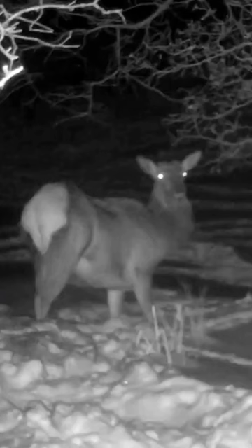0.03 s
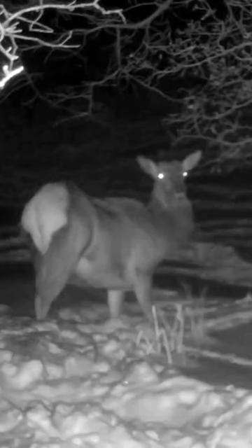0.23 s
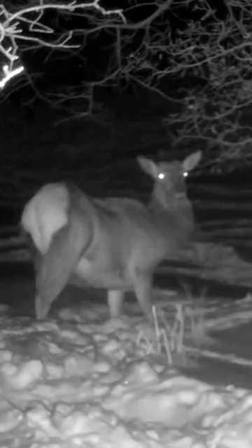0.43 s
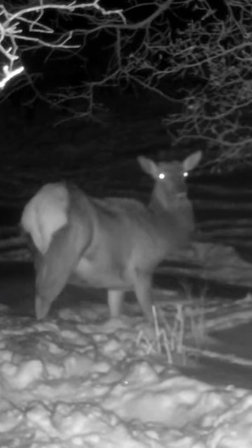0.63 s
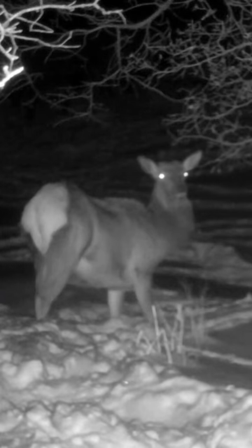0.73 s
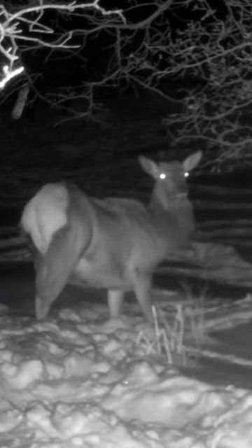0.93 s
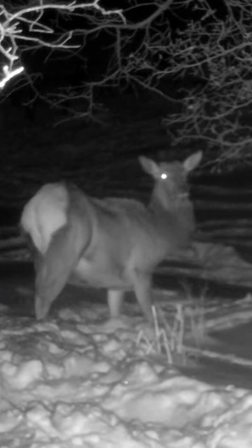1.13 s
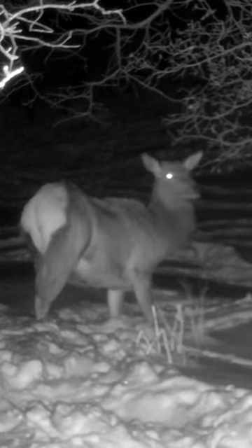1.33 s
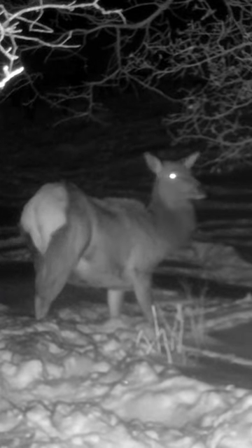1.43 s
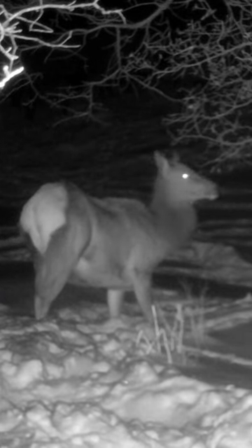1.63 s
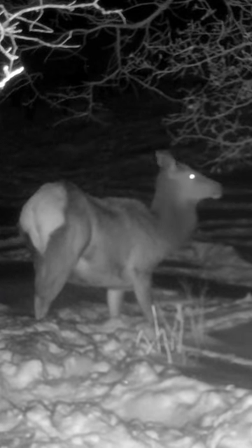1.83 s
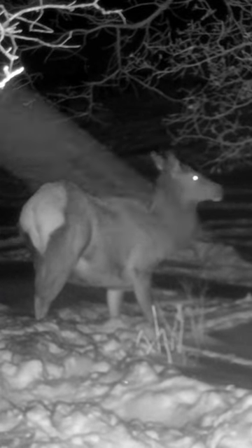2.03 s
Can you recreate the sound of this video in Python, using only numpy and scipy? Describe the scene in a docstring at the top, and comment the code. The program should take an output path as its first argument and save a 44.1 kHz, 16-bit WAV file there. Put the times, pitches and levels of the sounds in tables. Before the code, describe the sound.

An elk mews far off and another squeal drops in pitch beside a rushing stream.

```python
"""Water rushes steadily in a stream at night, while a trail camera's electronics whine and tick at the frame
rate and its housing clicks once. A far elk gives a faint, long falling mew with a second voice under its end;
then a nearer squeal drops by more than an octave. Each voice is a harmonic source filtered by fixed resonances
(for the squeal, peaks and notches as from a ground reflection's comb), with a hiss of breath, and echoes from
banks and trees."""
import sys
import numpy as np
from scipy import signal
from scipy.fft import rfft, irfft, next_fast_len
from scipy.io import wavfile
from scipy.ndimage import uniform_filter1d, map_coordinates

SR = 44100
rng = np.random.default_rng(int(sys.argv[2]) if len(sys.argv) > 2 else 0)


def dump_mix(stems):
    """Bounce the given channels to the path in sys.argv[1] as a 16-bit WAV at rate SR."""
    frames = np.atleast_2d(stems).T  # one column per channel
    limited = np.clip(frames, -1, 1)  # hard clip at full scale
    pcm = np.round(limited * 32767).astype(np.int16)
    wavfile.write(sys.argv[1], SR, pcm)


N = 92610
T = np.arange(N) / SR

# Spectrum of rushing water (frequency [Hz], relative density [dB])
WATER_SPECTRUM = [(25, -17), (76, -14.5), (200, -7.5), (350, -5.5), (800, -3), (1600, -5), (2400, -8.5),
                  (3500, -16.5), (4700, -22.5), (5300, -31.5), (7000, -32), (9500, -39), (15500, -40.5)]
# Filter of the frame ticks (frequency [Hz], gain [dB])
TICK_FILTER = [(500, -17), (4000, 6), (6500, -8), (8700, -8), (11500, -36)]
# Impulses entering that filter (time [s], level [dB])
TICK_DRIVE = [(1.54, -42.5), (1.58, -49)]
# Modes of the camera housing (frequency [Hz], relative level [dB], T60 [s])
HOUSING_MODES = [(1417, -20, 0.088), (1910, 1.5, 0.022), (2054, -14, 0.03), (3054, -2, 0.012),
                 (3170, 0.5, 0.0082), (3326, 1.5, 0.011), (3860, -3.5, 0.016), (4600, -3, 0.014),
                 (5200, -27, .05)]
# Noise of the snap (frequency [Hz], relative level [dB])
CRACK_SPECTRUM = [(400, -27), (1100, 4), (4700, 11), (5200, -13), (6500, -12), (8000, -4.5), (10000, -19)]
# Path from housing to microphone (frequency [Hz], gain [dB])
HOUSING_PATH = [(700, -1.5), (1100, 5), (1600, -0.5), (4900, -0.5), (5400, -8), (8500, -5), (11000, -29.5)]
# Peaks of the breath (time [s], level [dB])
BREATH_PEAKS = [(.29, -69), (.9, -63.5), (1.96, -61.5)]
# Hiss of the breath (frequency [Hz], relative level [dB])
BREATH_SPECTRUM = [(1500, -20), (3300, 3), (4700, -4), (5300, -41)]
# Fundamentals of the calls (time [s], frequency [Hz])
MEW_F0 = [(.3, 731), (.355, 758), (.38, 717.4), (.45, 657.4), (.5, 606), (.55, 564.3), (.6, 543),
          (.7, 501.7), (.775, 467), (.87, 436)]
SQUEAL_F0 = [(1.545, 1810), (1.575, 1930), (1.605, 1905), (1.65, 1797), (1.7, 1600), (1.725, 1462),
             (1.755, 1312), (1.763, 1185), (1.785, 1050), (1.812, 909.6), (1.828, 880.7), (1.843, 810),
             (1.895, 721.6), (1.928, 687), (1.97, 728)]
# Envelopes of the mew and of the squeal's fundamental and overtones (time [s], level [dB])
MEW_ENVELOPE = [(.3, -67), (.36, -61.5), (.44, -54), (.48, -55), (.52, -61), (.58, -60.5), (.71, -61),
                (.78, -59.5), (.83, -60), (.87, -58)]
SQUEAL_F0_ENVELOPE = [(1.54, -60), (1.572, -54), (1.594, -43.5), (1.604, -57.5), (1.63, -59), (1.642, -42),
                      (1.656, -46), (1.678, -63), (1.694, -47), (1.71, -43), (1.74, -47.5), (1.765, -74)]
SQUEAL_OVERTONE_ENVELOPE = [(1.55, -64), (1.652, -60), (1.667, -49), (1.684, -42.5), (1.703, -38),
                            (1.713, -47), (1.725, -38), (1.74, -35.5), (1.756, -43), (1.765, -41),
                            (1.786, -41), (1.794, -45.5), (1.825, -50.5), (1.848, -61.5), (1.897, -51.5),
                            (1.927, -59), (1.95, -52.5), (1.97, -58)]
# Resonances of the vocal tracts of the mew and the second voice, and the squeal's fixed peaks and notches, as
# from a ground reflection's comb (frequency [Hz], relative gain [dB])
MEW_FORMANTS = [(800, -30), (1300, -17), (1600, -12), (1880, 6), (2100, -1.5), (2300, -11), (2520, 1),
                (2750, -1), (3020, 4.5), (3350, 7), (3600, 4), (3950, -27.5)]
ANSWER_FORMANTS = [(900, -21), (1280, -7), (1550, -24), (1880, -2.5), (2270, -12), (2500, 2), (2650, 1.5),
                   (2800, 5), (3170, 4.5), (3450, -8), (4400, -36)]
SQUEAL_COLOUR = [(1400, 3), (1750, -14), (2100, 1.5), (2400, -3), (2560, -15), (2800, 2), (3020, -11.5),
                 (3230, 3.5), (3500, -3.5), (3750, -7.5), (4200, 11), (4650, -2.5), (5000, -23.5),
                 (5450, -23.5), (6400, -68)]
# Course of the second voice (time [s], fundamental [Hz], level [dB])
ANSWER_CONTOUR = [(.66, 521.5, -66), (.745, 456.4, -60.5), (.795, 404.9, -57), (.83, 374.2, -56.5),
                  (.862, 352.1, -52), (.89, 324, -57.5), (.925, 314.9, -53.5), (.96, 293.7, -63.5),
                  (1.05, 250, -70)]
# Its source timbre (time [s], roughness [0-1], tilt [dB/octave])
ANSWER_TIMBRE = [(.86, 0.04, 3), (.92, 0.2, -6), (.97, 0.65, -6.5)]
# Noisy share of the squeal's power (time [s], roughness [0-1])
SQUEAL_ROUGHNESS = [(1.6, 0.06), (1.618, 0.36), (1.64, 0.03), (1.745, 0.04), (1.76, 0.14), (1.8, 0.06),
                    (1.92, .03), (1.97, 0.7)]
# Odd overtones relative to even ones at the source (time [s], gain [dB])
SQUEAL_ODD_GAIN = [(1.61, -8), (1.65, 11), (1.675, -7), (1.725, -2), (1.75, -7.5), (1.766, 3),
                   (1.783, -0.5), (1.8, -28), (1.822, 3.5), (1.86, 4), (1.9, 10), (1.95, 4)]
# Decay of sound in the woods (frequency [Hz], T60 [s])
WOODS_T60 = [(300, .44), (5000, 0.36), (10000, 0.078)]


def amp(db):
    """Amplitude ratio of a level in decibels."""
    return 10 ** (np.asarray(db) / 20)


def unit(x):
    """Normalisation to rms 1."""
    return x / np.sqrt(np.mean(x ** 2) + 1e-20)


def along(points, hz):
    """Interpolation on a logarithmic frequency axis."""
    f, v = np.transpose(points)
    return np.interp(np.log(hz + 1), np.log(f + 1), v)


def curve(rows, column=1):
    """Linear interpolation of a timed table at every sample."""
    rows = np.asarray(rows)
    return np.interp(T, rows[:, 0], rows[:, column])


def during(rows, fade_s=0.009):
    """Trapezoidal window: 1 over a timed table's span, fading outside it."""
    return np.clip(1 + np.minimum(T - rows[0][0], rows[-1][0] - T) / fade_s, 0, 1)


def wobble(rate):
    """Smooth random modulation with rate knots a second."""
    return map_coordinates(rng.standard_normal(int(N * rate / SR) + 4), [T * rate])


def coloured(x, spectrum):
    """Zero-phase filtering by a (frequency [Hz], gain [dB]) table."""
    size = next_fast_len(N + 8192)
    gain = amp(along(spectrum, np.fft.rfftfreq(size, 1 / SR)))
    return irfft(rfft(x, size) * gain, size)[:N]


def noise(spectrum):
    """Spectrally shaped Gaussian noise of rms 1."""
    return unit(coloured(rng.standard_normal(N), spectrum))


def stream(level_db=-56.5, ripple_db=1.0):
    """Rushing water is broadband noise with slight amplitude modulation."""
    return noise(WATER_SPECTRUM) * amp(level_db + ripple_db * wobble(11.84))


def electronics(whine_hz=7796, whine_db=-72.5, frame_hz=59.5, offset_s=0.01645):
    """Phase reversal: a wavering whine flips sign at every frame, and an impulse sounds a tick."""
    frame = np.floor((T - offset_s) * frame_hz)
    sign = 1 - 2 * (frame % 2)
    soft_sign = uniform_filter1d(uniform_filter1d(sign, size=48), size=48)
    whine = np.sqrt(2) * np.sin(2 * np.pi * whine_hz * T) * soft_sign
    impulses = np.diff(frame, prepend=frame[0]) * amp(1.3 * wobble(39))
    ticks = amp(curve(TICK_DRIVE)) * coloured(impulses, TICK_FILTER)
    return amp(whine_db + 1.83 * wobble(120)) * whine + ticks


def click(onset_s=0.1388, rise_s=0.00054, crack_t60=0.032, tail_t60=0.085, gain_db=-21):
    """Impact excitation: a mechanism snaps in the camera and rings its plastic housing's damped modes."""
    t = np.maximum(T - onset_s, 0)
    ring = sum(amp(db - 60 * t / t60) * np.sin(2 * np.pi * hz * t) for hz, db, t60 in HOUSING_MODES)
    decay = amp(-12 - 60 * t / crack_t60) + amp(-29 - 60 * t / tail_t60)
    crack = noise(CRACK_SPECTRUM) * decay
    attack = 1 - np.exp(-t / rise_s)
    return amp(gain_db) * coloured((ring + crack) * attack, HOUSING_PATH)


def breath(sigma_s=0.054):
    """Aspiration: air hisses through the elk's throat where the voice starts or gives out."""
    swells = sum(amp(db) * np.exp(-.5 * ((T - s) / sigma_s) ** 2) for s, db in BREATH_PEAKS)
    return swells * noise(BREATH_SPECTRUM)


def harmonics(pitch, roughness, smear_hz, count, jitter=0.0031, shimmer_db=1.3):
    """Voiced source with jitter and shimmer, one harmonic a row; roughness smears each into noise."""
    phase = 2 * np.pi * np.cumsum(pitch * (1 + jitter * wobble(220))) / SR
    rows = []
    for k in range(1, count + 1):
        tone = np.sqrt(2) * np.sin(k * phase) * amp(shimmer_db * wobble(70))
        band = wobble(smear_hz) * np.sin(k * phase) + wobble(smear_hz) * np.cos(k * phase)
        rows.append(np.sqrt(1 - roughness) * tone + np.sqrt(roughness) * band)
    return np.array(rows)


def through_colour(rows, hz, formants, source_db):
    """Source-filter principle: source spectrum and a fixed colouring weight the harmonics, at constant power."""
    gain = amp(along(formants, hz) + source_db)
    return (rows * gain).sum(0) / np.sqrt((gain ** 2).sum(0))


def far_mew(dulling=16.4):
    """A clear voice sinks through fixed formants; its spectral tilt steepens by dulling [dB/octave/s]."""
    pitch = curve(MEW_F0)
    rows = harmonics(pitch, roughness=0.035, smear_hz=298, count=10)
    k = np.arange(1, len(rows) + 1)[:, None]
    tilt = -dulling * (T - MEW_F0[0][0])
    voice = through_colour(rows, k * pitch, MEW_FORMANTS, tilt * np.log2(k))
    return voice * amp(curve(MEW_ENVELOPE)) * during(MEW_F0)


def far_answer():
    """A second voice falls across the mew's end; growing aperiodicity turns it hoarse."""
    pitch = curve(ANSWER_CONTOUR)
    rows = harmonics(pitch, roughness=curve(ANSWER_TIMBRE), smear_hz=207, count=14)
    k = np.arange(1, len(rows) + 1)[:, None]
    tilt = curve(ANSWER_TIMBRE, column=2)
    voice = through_colour(rows, k * pitch, ANSWER_FORMANTS, tilt * np.log2(k))
    return voice * amp(curve(ANSWER_CONTOUR, column=2)) * during(ANSWER_CONTOUR)


def echoes(x, bank_s=0.039, bank_db=-22.5, woods_db=-19.5):
    """One early reflection from a bank, and diffuse reverberation from trees and banks."""
    reflection = np.roll(x, int(bank_s * SR))
    hz, t, spectra = signal.stft(rng.standard_normal(SR // 2), SR, nperseg=256)
    decay = amp(-60 * t / along(WOODS_T60, hz)[:, None])
    response = signal.istft(spectra * decay, SR, nperseg=256)[1]
    reverberation = signal.fftconvolve(x, response / np.linalg.norm(response))[:N]
    return amp(bank_db) * reflection + amp(woods_db) * reverberation


def near_squeal(full_effort_tilt=-5, dulling_per_db=0.25):
    """Vocal effort sets spectral tilt: a thin high note brightens as it falls, breaks, and rasps out."""
    pitch, level = curve(SQUEAL_F0), curve(SQUEAL_OVERTONE_ENVELOPE)
    rows = harmonics(pitch, roughness=curve(SQUEAL_ROUGHNESS), smear_hz=494.4, count=6)
    k = np.arange(2, len(rows) + 1)[:, None]
    tilt = full_effort_tilt + dulling_per_db * (level - level.max())  # dB/octave
    source_db = tilt * np.log2(k) + (k % 2) * curve(SQUEAL_ODD_GAIN)
    overtones = through_colour(rows[1:], k * pitch, SQUEAL_COLOUR, source_db) * amp(level)
    fundamental = rows[0] * amp(curve(SQUEAL_F0_ENVELOPE))
    return (fundamental + overtones) * during(SQUEAL_F0)


def scene():
    """Superposition of the elk, their echoes, the stream and the camera's own noises."""
    elk = far_mew() + far_answer() + near_squeal() + breath()
    return (elk + echoes(elk) + stream() + click() + electronics())[None]


def record(dry, start_s=0.106, fade_s=0.002, cutoff_hz=15550):
    """Gating and band limiting: the camera's sound switches on after a moment and is low-passed."""
    gate = np.clip((T - start_s) / fade_s, 0, 1)
    size = next_fast_len(N + 8192)
    passband = np.fft.rfftfreq(size, 1 / SR) < cutoff_hz
    return irfft(rfft(dry * gate, size) * passband, size)[..., :N]


dry = scene()
out = record(dry)
dump_mix(out)
```